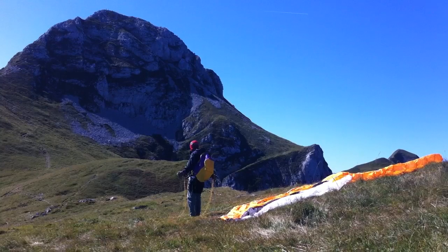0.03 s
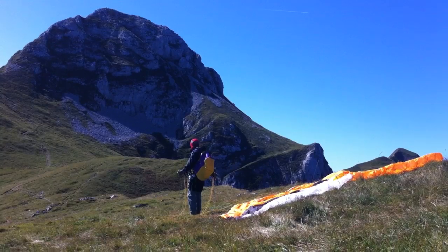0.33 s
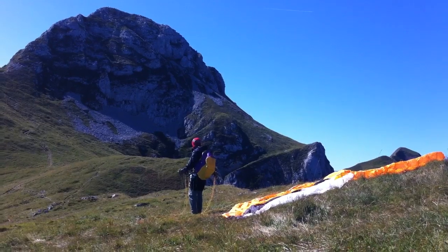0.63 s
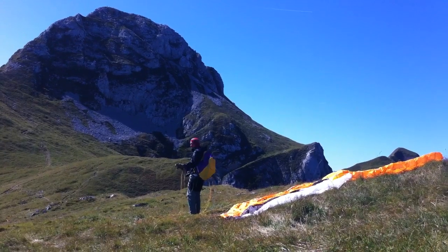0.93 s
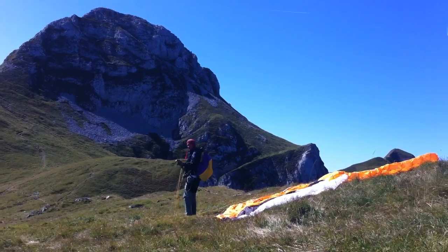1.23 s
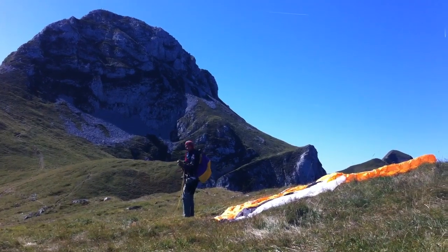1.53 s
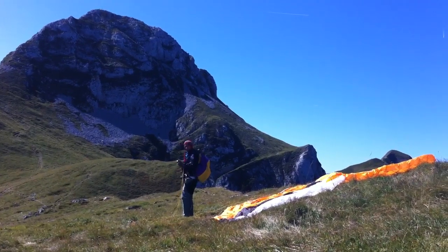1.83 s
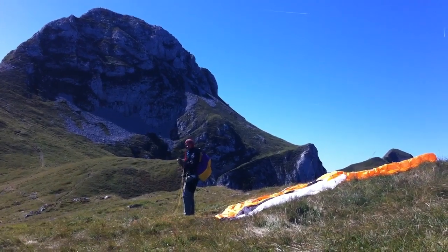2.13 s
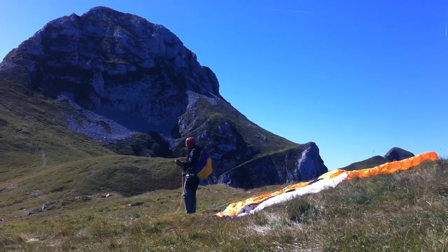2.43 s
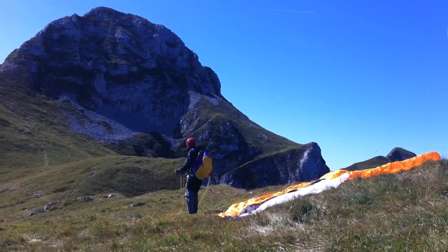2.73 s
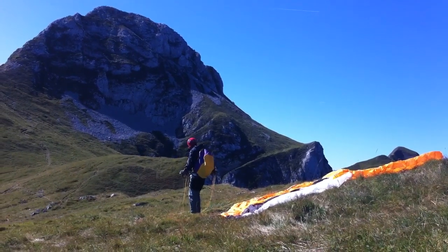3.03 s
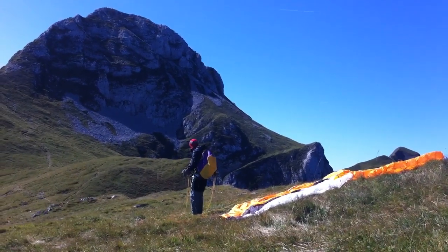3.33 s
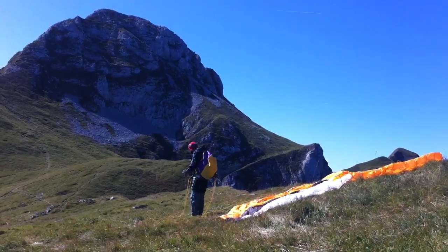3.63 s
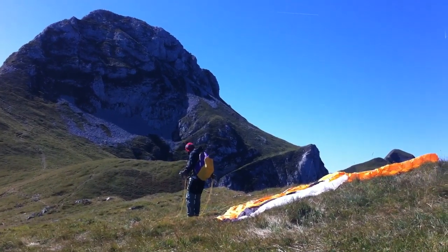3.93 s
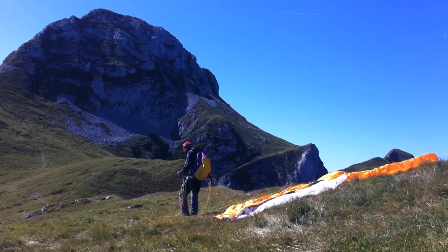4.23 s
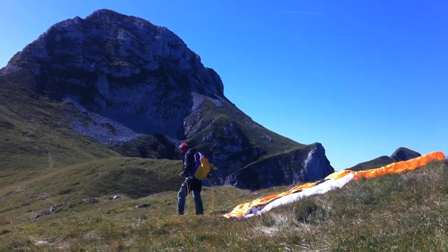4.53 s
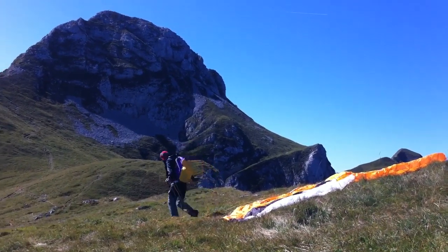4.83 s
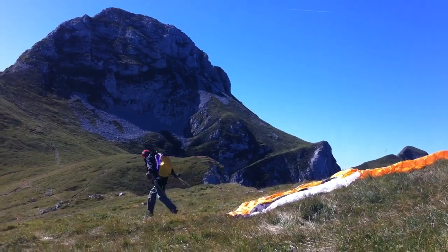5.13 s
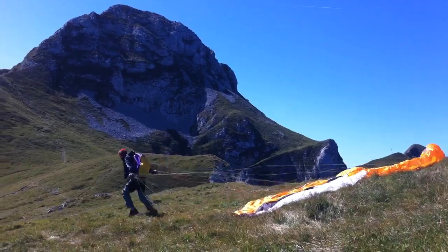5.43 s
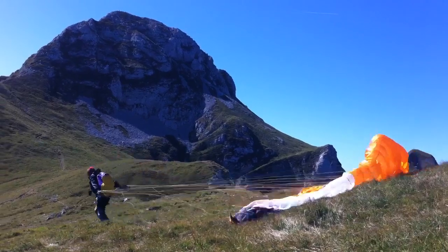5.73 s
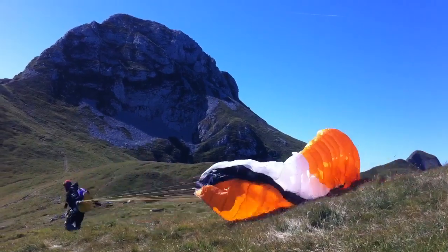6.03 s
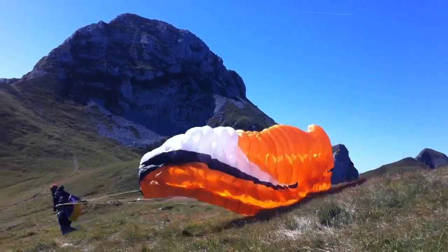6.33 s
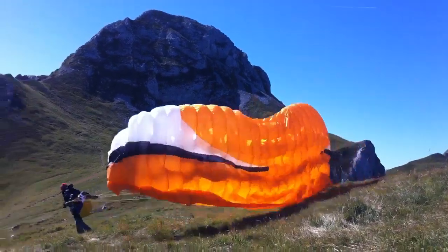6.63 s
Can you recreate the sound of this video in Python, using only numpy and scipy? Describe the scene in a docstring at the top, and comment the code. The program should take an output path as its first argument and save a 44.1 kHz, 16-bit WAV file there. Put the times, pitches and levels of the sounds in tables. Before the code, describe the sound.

Faint, high, raspy cricket chirps dot a quiet mountainside while soft puffs of wind thump on the microphone, briefly building to a gust in the middle. After the wind eases, a paraglider wing is hauled across the grass a short way off. Its fabric swishes and rustles, swelling with a rush of air and a low thrum, loudest as it leaves the ground at the end.

```python
"""First you hear a light, uneven breeze thumping on the microphone over a faint hiss, while bush
crickets chirp in the grass by scraping their wings. Near the end, some metres away, a paraglider
pilot runs down the mountain slope to launch: the nylon wing drags over the grass, crinkles and
swells with air, and at last lifts off."""
import sys
import numpy as np
from scipy import signal
from scipy.fft import rfft, irfft, next_fast_len
from scipy.io import wavfile
from scipy.ndimage import uniform_filter1d, map_coordinates

SR = 44100
rng = np.random.default_rng(int(sys.argv[2]) if len(sys.argv) > 2 else 0)


def file_out(sig):
    """Save sig as 16-bit WAV at sys.argv[1]."""
    # one column per channel
    cols = np.atleast_2d(sig).T
    # limit, then scale
    lim = np.clip(cols, -1, 1)
    pcm = np.round(lim * 32767).astype(np.int16)
    wavfile.write(sys.argv[1], SR, pcm)


N = 295029
TIME = np.arange(N) / SR

# Tone colours, as relative strength at each frequency: f/Hz, level/dB
HISS_SPECTRUM = [(25, -11), (60, 3), (150, 0), (400, -3), (750, -4), (1100, -5.5), (2500, -7), (4500, -7.5),
                 (7000, -9.5), (9500, -10), (10700, -12), (12400, -9.5), (13500, -11), (17000, -8)]   # the faint, even hiss
RUMBLE_SPECTRUM = [(25, -38), (45, -26), (70, -5.5), (100, 0.5), (140, 3.5), (200, -3), (270, -11.5),
                   (380, -23.5), (550, -35), (1000, -56.5)]   # wind on the microphone
SWIRL_SPECTRUM = [(120, -15), (220, -2.5), (320, 2), (450, -8), (600, -21), (1000, -45)]   # the fine swirls into which an eddy (a whirl of air) breaks up
WHOOSH_SPECTRUM = [(60, -45), (200, -28), (350, -9.5), (500, -7.5), (720, -3.5), (1000, 0), (1150, -2),
                   (1500, 2), (1750, 0), (2050, -9), (2800, -12), (5000, -40)]   # the wing swelling with air
RUSTLE_SPECTRUM = [(1200, -33), (1900, -10.5), (2300, -8.5), (2900, -1), (3550, -3.5), (4200, -12),
                   (4500, -9), (4950, -6), (5500, -6.5), (6200, -15.5), (6900, -15.5), (9000, -27)]   # crinkling nylon
SWISH_SPECTRUM = [(1500, -60), (4500, -26), (6300, -7), (6950, -12), (7400, 3), (8500, 0), (9600, 3.5),
                  (11800, 0.5), (13000, -9), (14000, -16), (15300, -4), (17000, -11)]   # nylon sliding over grass
THRUM_SPECTRUM = [(40, -54), (70, -28), (100, -13.5), (130, -4), (165, -2), (220, -7), (290, -13),
                  (450, -25.5), (900, -44)]   # the wing's cells (its pockets) taking in air
# Wind strength at the microphone, with a gust just after 3 s: t/s, level/dB
WIND_STRENGTH = [(0.04, -65.5), (0.3, -67.5), (0.45, -54.5), (0.57, -65.5), (1.2, -73), (1.68, -64),
                 (1.87, -73), (2.23, -64), (2.36, -76), (2.92, -82), (3.08, -52.5), (3.34, -43), (3.5, -50),
                 (3.62, -45.5), (3.73, -63), (4.3, -67), (4.57, -58), (5.6, -70.5)]
# Large eddies that hit the microphone: t/s, level/dB, roundness (3 a sharp thump, 12 a soft wobble)
LARGE_EDDIES = [(0.092, -52.5, 7.6), (0.395, -36.5, 6), (0.62, -47.5, 5.6), (1.336, -39.5, 4.6),
                (1.415, -52, 4), (1.484, -51.5, 14), (1.579, -50, 12), (1.63, -51, 9), (1.806, -41.5, 5),
                (1.932, -54, 8.9), (2.048, -46.5, 7.1), (2.665, -56, 4.6), (3.012, -47, 8.3),
                (3.077, -35, 4.2), (3.192, -37.5, 15), (3.22, -35.5, 16), (3.258, -30, 1.86),
                (3.273, -31.5, 20), (3.356, -33, 13), (3.37, -26, 10), (3.403, -29, 26), (3.584, -34, 1.9),
                (3.646, -37, 9), (3.79, -43.5, 7.1), (4.071, -45.5, 6.4), (4.134, -48, 8.6),
                (4.486, -44.5, 3.8), (4.6, -44, 7.2), (4.708, -50, 7.8), (4.79, -48, 9.5),
                (4.991, -48.5, 8.1), (5.09, -46.5, 4.4)]
# Cricket chirps, each given by its last stroke: t/s, level/dB, clearness (0 a rasp, 1 ringing ticks)
CRICKET_CHIRPS = [(0.256, -57, 0), (0.581, -51, 0.58), (0.851, -50, 0.068), (1.072, -57, 0),
                  (1.411, -56, 0), (1.736, -59, 0), (2.108, -50, 0.49), (2.167, -51, 0.1), (2.519, -58, 0),
                  (2.841, -52, 0.39), (3.142, -48.5, 0.04), (3.158, -50, 0.51), (3.434, -57, .2),
                  (3.784, -54.5, .1), (3.837, -48, 0.97), (4.221, -54, .2), (4.612, -54.5, 0.28),
                  (4.887, -54, 0), (4.941, -59, .1), (5.348, -52, 0), (5.382, -50, 1), (5.420, -49, 1),
                  (5.833, -50, 1)]
# How hard the wing is hauled through grass and air: t/s, level/dB
WING_PULL = [(4.9, -82), (5.17, -75), (5.3, -70), (5.47, -67.5), (5.55, -59), (5.63, -57), (5.76, -48.5),
             (5.99, -43.5), (6.1, -45), (6.3, -41.5), (6.5, -43.5), (6.61, -41), (6.69, -35)]

EDDY_HZ, CALM_DB, EDDY_HZ_PER_DB = 121.2, -62.5, 1.15   # an eddy's pitch in calm air; it rises with wind
STROKE_S, STROKE_SLOWING_S = .0127, .006   # time between a cricket's strokes; extra for a clear chirp
SWELL_DB, CLEAR_SWELL_DB = 2, 4   # growth with each stroke; extra for a clear chirp
FOREWING_LOW_HZ, RASP_WIDTH_HZ, CLEAR_WIDTH_HZ = 13400, 4200, 1700   # where a cricket's wing rings
FULL_PULL_DB = -43   # the pull that counts as full
LIFT_OFF_S, LIFT_S = 6.5, 0.059   # when the filled wing leaves the grass, and how long that takes


def from_db(db):
    """Turn decibels into a factor to multiply by."""
    return 10 ** (np.asarray(db) / 20)


def unit_power(x):
    """Scale a signal so that its average power is 1."""
    return x / np.sqrt(np.mean(x ** 2) + 1e-20)


def level_at(table, when):
    """Read a level off a table, joining its points with straight lines."""
    return np.interp(when, *np.transpose(table))


def colour(x, spectrum):
    """Give white noise a tone colour, at power 1."""
    hz, db = np.transpose(spectrum)
    size = next_fast_len(N)
    bins_hz = np.maximum(np.fft.rfftfreq(size, 1 / SR), 1)
    gain = from_db(np.interp(np.log(bins_hz), np.log(hz), db))
    return unit_power(irfft(rfft(x, size) * gain, size)[:N])


def drift(rate_hz):
    """A slow random wobble, about 1 in size."""
    bins_hz = np.fft.rfftfreq(N, 1 / SR)
    return unit_power(irfft(rfft(rng.standard_normal(N)) / (1 + (bins_hz / rate_hz) ** 2), N))


def hiss(level_db=-66.5):
    """A faint, even hiss lies behind everything."""
    return from_db(level_db) * colour(rng.standard_normal(N), HISS_SPECTRUM)


def breeze(gain_db=-2.5, steady_s=0.0091, puff_db=2.5):
    """The smallest eddies merge into a puffing rumble that follows the wind."""
    flow = colour(rng.standard_normal(N), RUMBLE_SPECTRUM)
    flow /= np.sqrt(uniform_filter1d(flow ** 2, int(steady_s * SR)) + 0.17)   # even out the loudness
    return from_db(level_at(WIND_STRENGTH, TIME) + gain_db + puff_db * drift(rate_hz=10.6)) * flow


def small_eddies(per_s=16, over_wind_db=5.5, spread_db=4.5, roundness=8.2, count=140):
    """Small eddies pass at uneven gaps, stronger in more wind. Rows: t/s, level/dB, roundness."""
    times = (np.arange(count) + rng.random(count)) / per_s
    scatter_db = spread_db * np.clip(rng.standard_normal(count), -2, 2)
    levels = level_at(WIND_STRENGTH, times) + over_wind_db + scatter_db
    return [(when, db, roundness) for when, db in zip(times, levels) if when < TIME[-1]]


def eddies(low_cut_hz=70, swirl_db=-26, swirl_s=0.011, scatter_octaves=.1):
    """Each eddy thumps: one short swing of pressure, quicker in a gust, wrapped in finer swirls."""
    out = np.zeros(N)
    swirls = colour(rng.standard_normal(N), SWIRL_SPECTRUM)
    all_eddies = LARGE_EDDIES + small_eddies()
    for (when, db, roundness), (phase, detune) in zip(all_eddies, rng.uniform(-0.92, 1, (200, 2))):
        wind_db = level_at(WIND_STRENGTH, when)
        hz = (EDDY_HZ + EDDY_HZ_PER_DB * (wind_db - CALM_DB)) * 2 ** (scatter_octaves * detune)
        near = slice(*np.searchsorted(TIME, [when - .05, when + .05]))
        t = TIME[near] - when
        # a brief wave that fades on both sides; a rounder one wobbles for longer
        swing = np.real(np.exp(1j * np.pi * phase) / (1 - 2j * np.pi * hz * t / roundness) ** (roundness + 1))
        swirl = from_db(swirl_db) * np.exp(-(t / swirl_s) ** 2) * swirls[near]
        out[near] += from_db(db) * (swing + swirl)
    microphone = signal.butter(3, low_cut_hz, "high", fs=SR, output="sos")   # loses the deepest part
    return signal.sosfilt(microphone, out)


def crickets(gain_db=-0.9, rise_s=0.0029, fall_s=0.0019, rasp_db=-9, rasp_hz=8200, tick_share=.4):
    """A chirp is four ever stronger strokes; each drags a row of teeth that makes the forewing ring."""
    out = np.zeros(N)
    rasp_band = signal.butter(2, rasp_hz, "high", fs=SR, output="sos")
    for when, db, clear in CRICKET_CHIRPS:
        gap_s = STROKE_S + STROKE_SLOWING_S * clear ** 2
        swell_db = SWELL_DB + CLEAR_SWELL_DB * clear
        width_hz = np.interp(clear, [0, 1], [RASP_WIDTH_HZ, CLEAR_WIDTH_HZ])
        length = np.interp(clear, [0, 1], [1, tick_share])   # clear strokes are shorter
        near = np.abs(TIME - when) < .09
        t = TIME[near] - when
        strokes = 0
        for k in range(4):   # count back from the last, loudest stroke
            age = t + k * gap_s
            strokes += from_db(-swell_db * k) * np.exp(-np.maximum(-age / rise_s, age / fall_s) / length)
        teeth, scrape = rng.standard_normal((2, len(t)))
        band_hz = [FOREWING_LOW_HZ, FOREWING_LOW_HZ + width_hz]
        forewing = signal.butter(2, band_hz, "band", fs=SR, output="sos")
        ring = unit_power(signal.sosfilt(forewing, teeth))
        rasp = (1 - clear) * from_db(rasp_db) * unit_power(signal.sosfilt(rasp_band, scrape))
        out[near] += from_db(db + gain_db) * strokes * (ring + rasp)
    return out


def crinkle(per_s, spread_db, rub_db):
    """Tiny creases snap at random, in uneven sizes, over the smooth noise of rubbing."""
    sizes = from_db(spread_db * np.minimum(rng.exponential(1, N), 4)) * rng.choice([-1, 1], N)
    snaps = sizes * (rng.random(N) < per_s / SR)
    return unit_power(snaps) + from_db(rub_db) * rng.standard_normal(N)


def brighten(x, octaves_per_s=0.24, middle_s=6.28):
    """Play a noise ever faster so that it grows brighter; its speed is normal at middle_s."""
    speed = 2 ** (octaves_per_s * (TIME - middle_s))
    return map_coordinates(x, [np.cumsum(speed)], order=5, mode="wrap")


def hollow(x, hz=7000, width_hz=330):
    """Take one narrow band out of the treble."""
    return signal.lfilter(*signal.iirnotch(hz, hz / width_hz, fs=SR), x)


def follow(pull_db, level_db, share):
    """A gain that is level_db at full pull and follows a share of the pull's rise and fall."""
    return from_db(level_db + share * (pull_db - FULL_PULL_DB))


def paraglider(lift_db=3.0, flutter_db=0.97, throb_db=2.3, pull_s=4.4, taut_s=4.75):
    """The lines tighten and the cloth slides, crinkles and fills; its flutter shakes all its sounds."""
    whoosh = colour(crinkle(per_s=2000, spread_db=0.5, rub_db=-0.5), WHOOSH_SPECTRUM)
    rustle = colour(crinkle(per_s=3500, spread_db=3.0, rub_db=5.5), RUSTLE_SPECTRUM)
    swish = brighten(colour(crinkle(per_s=5300, spread_db=1.5, rub_db=-6.0), SWISH_SPECTRUM))
    thrum = colour(rng.standard_normal(N), THRUM_SPECTRUM) * from_db(throb_db * drift(rate_hz=5.1))
    pull_db = level_at(WING_PULL, TIME)
    rustle *= from_db(pull_db)
    swish *= follow(pull_db, level_db=-54.5, share=0.74)
    whoosh *= follow(pull_db, level_db=-48.0, share=0.83)
    thrum *= follow(pull_db, level_db=-57.0, share=0.67)
    aloft = from_db(lift_db * np.clip((TIME - LIFT_OFF_S) / LIFT_S, 0, 1))
    air = whoosh * aloft + thrum / aloft   # off the ground: more whoosh, less thrum
    flutter = from_db(flutter_db * drift(rate_hz=17))
    tightness = np.interp(TIME, [pull_s, taut_s], [0, 1])
    return (hollow(rustle + swish) + air) * flutter * tightness


def scene():
    """Add hiss, paraglider, crickets and wind into one channel."""
    return (hiss() + paraglider() + crickets() + breeze() + eddies())[None]


def record(dry):
    """The sound sets in after a moment of silence; the highest treble is cut off steeply."""
    fade_in = np.interp(TIME, [.036, .048], [0, 1])
    cutoff_hz = 17250
    return signal.sosfilt(signal.ellip(12, .1, 80, cutoff_hz, fs=SR, output="sos"), dry * fade_in)


dry = scene()
out = record(dry)
file_out(out)
```